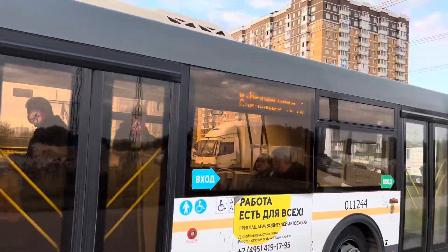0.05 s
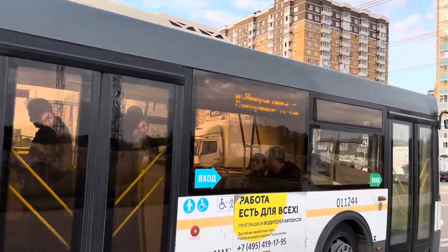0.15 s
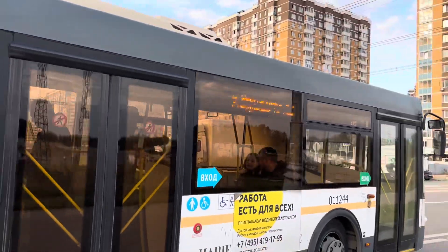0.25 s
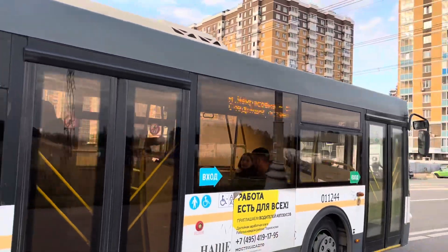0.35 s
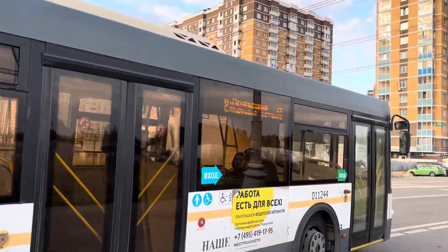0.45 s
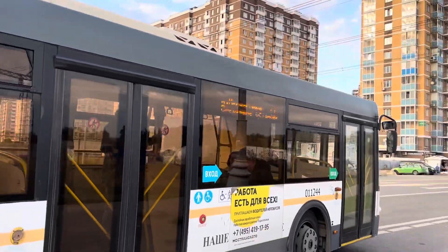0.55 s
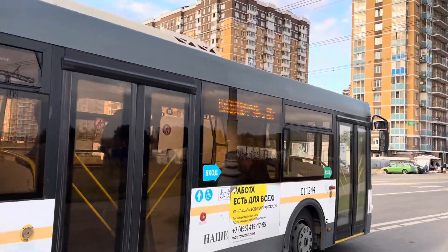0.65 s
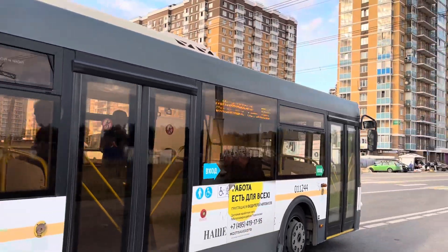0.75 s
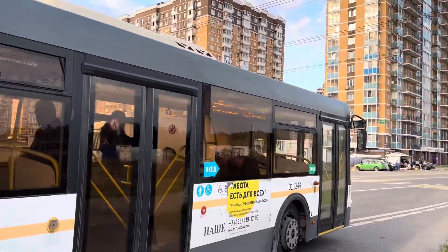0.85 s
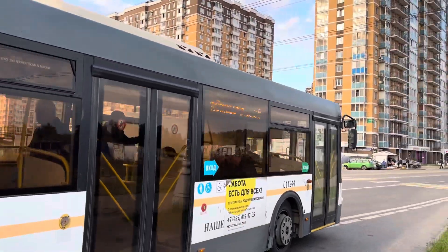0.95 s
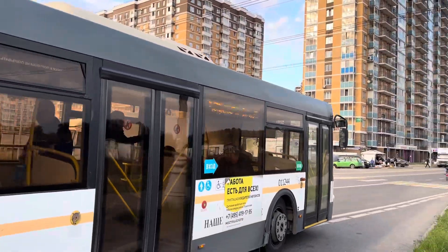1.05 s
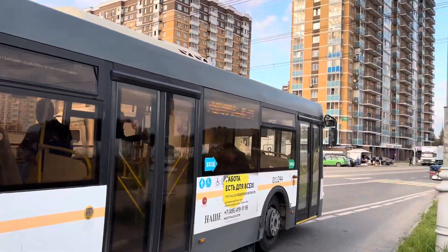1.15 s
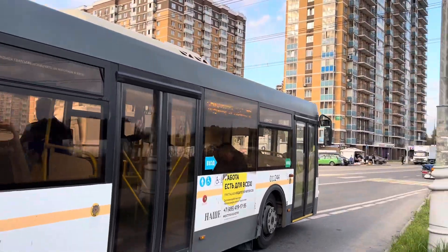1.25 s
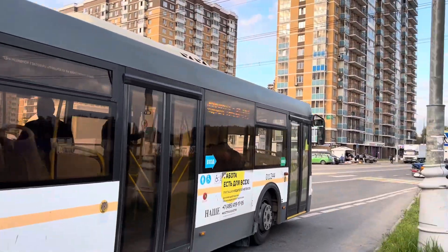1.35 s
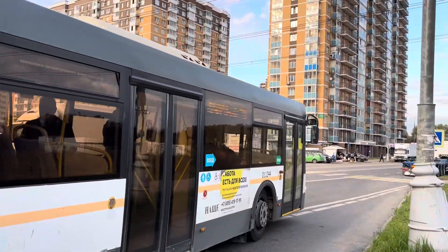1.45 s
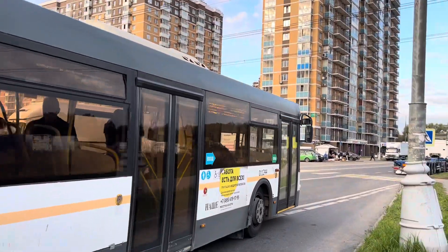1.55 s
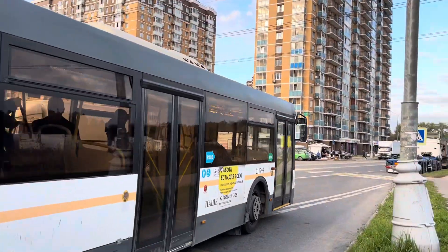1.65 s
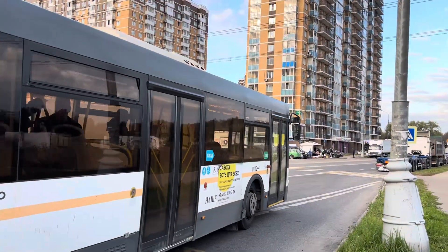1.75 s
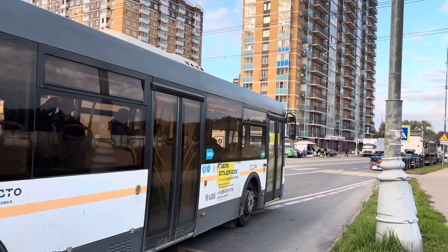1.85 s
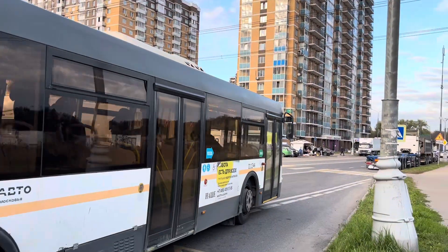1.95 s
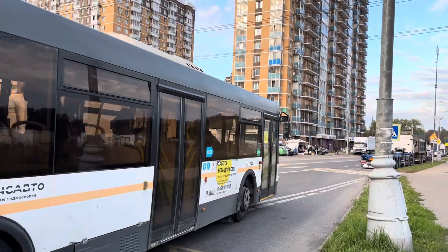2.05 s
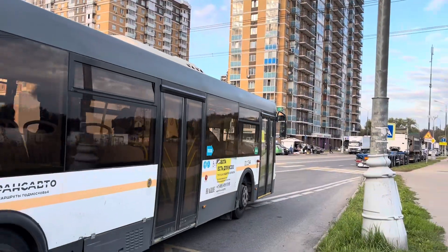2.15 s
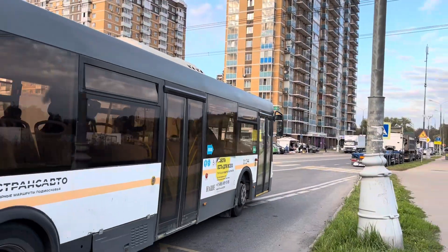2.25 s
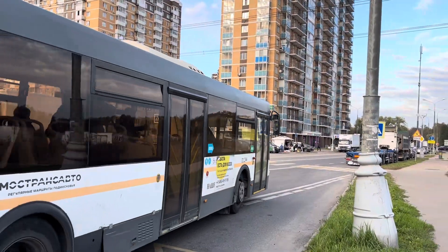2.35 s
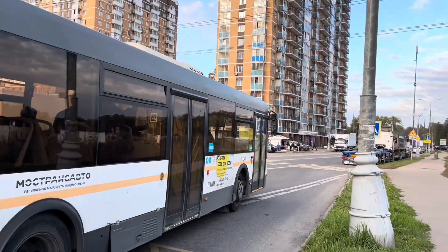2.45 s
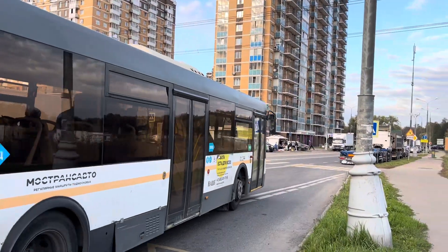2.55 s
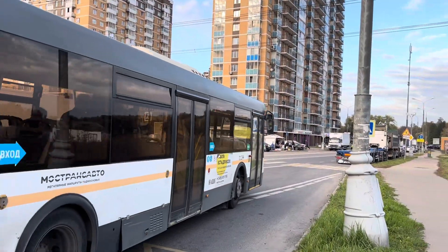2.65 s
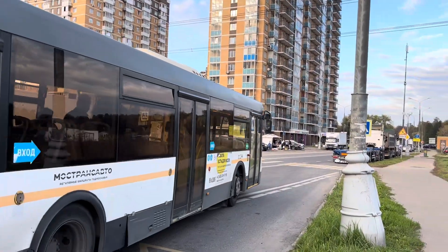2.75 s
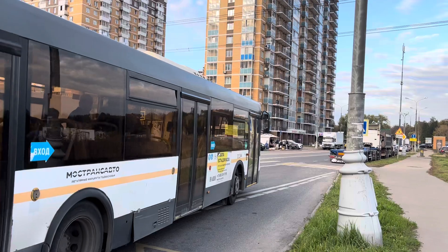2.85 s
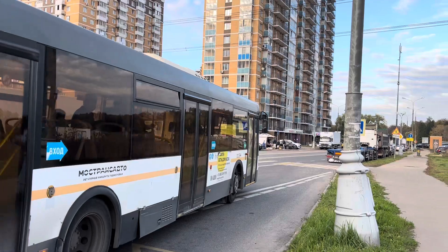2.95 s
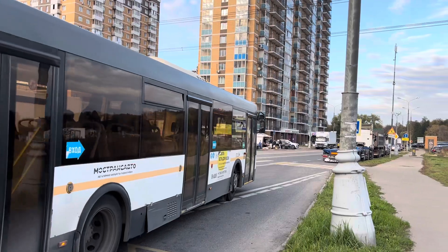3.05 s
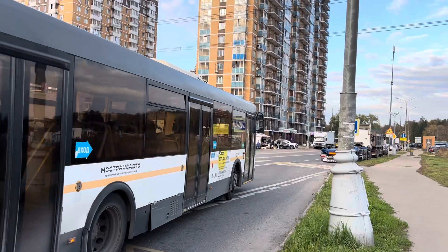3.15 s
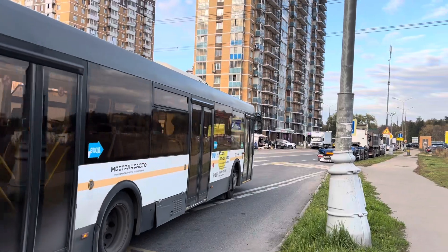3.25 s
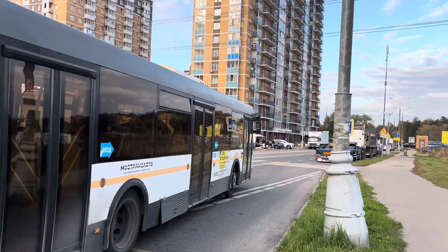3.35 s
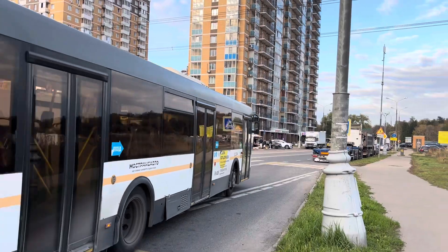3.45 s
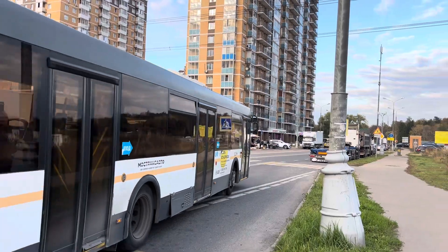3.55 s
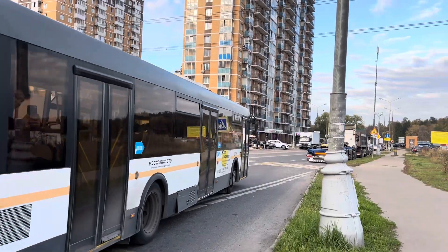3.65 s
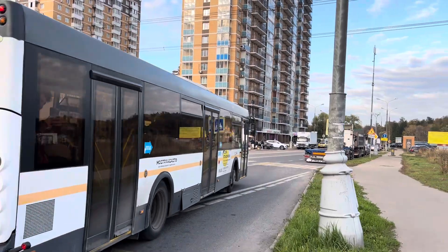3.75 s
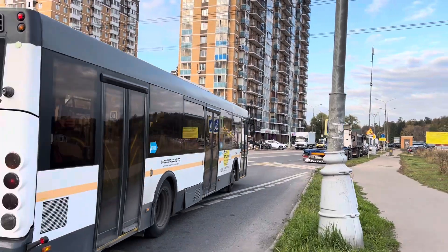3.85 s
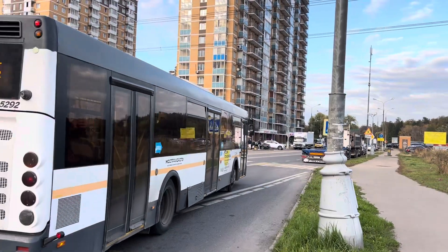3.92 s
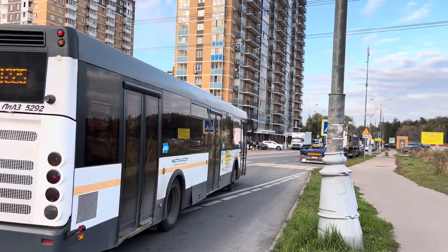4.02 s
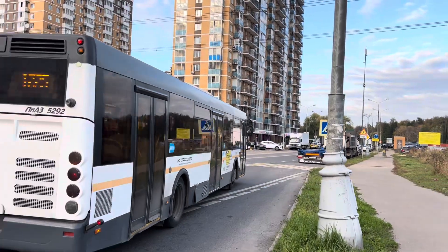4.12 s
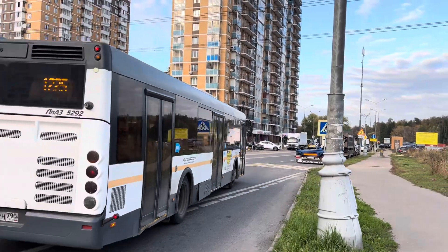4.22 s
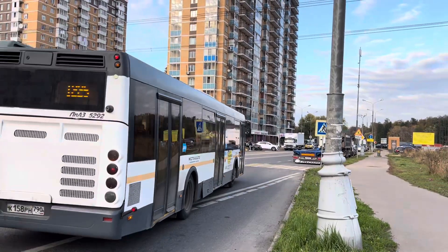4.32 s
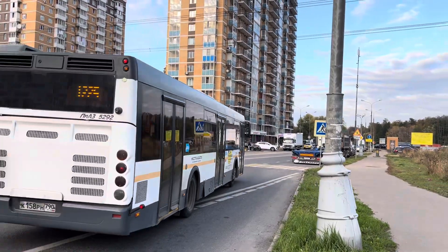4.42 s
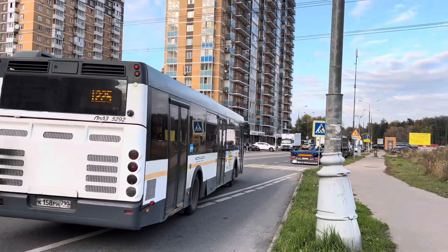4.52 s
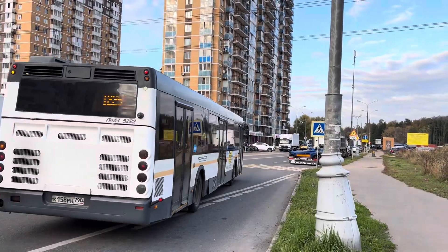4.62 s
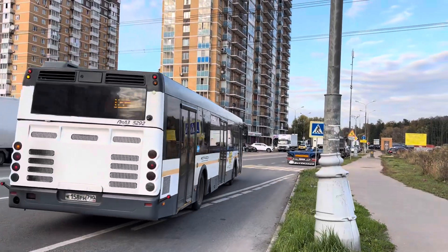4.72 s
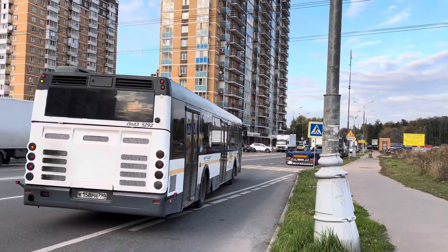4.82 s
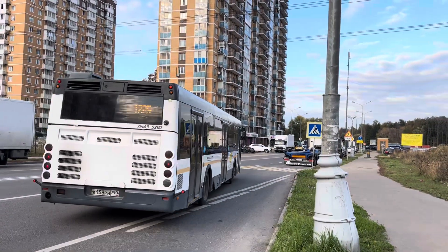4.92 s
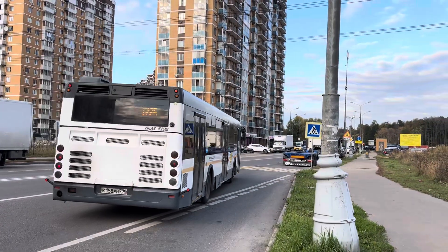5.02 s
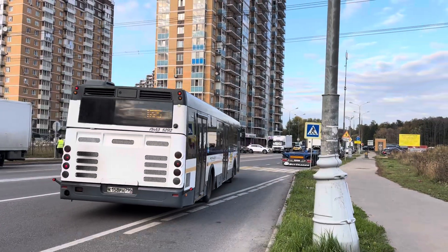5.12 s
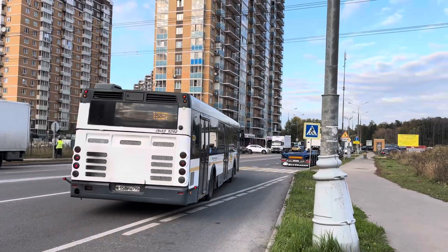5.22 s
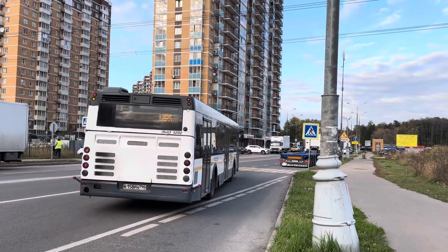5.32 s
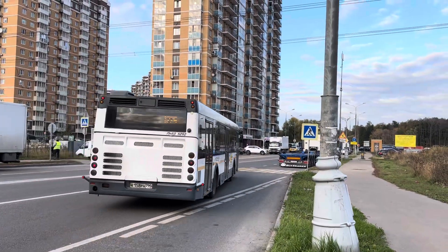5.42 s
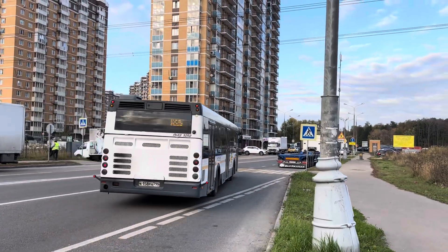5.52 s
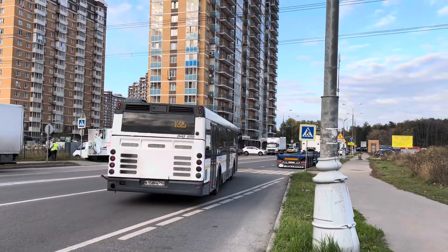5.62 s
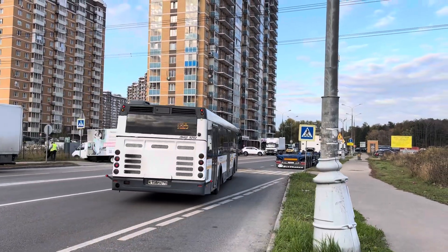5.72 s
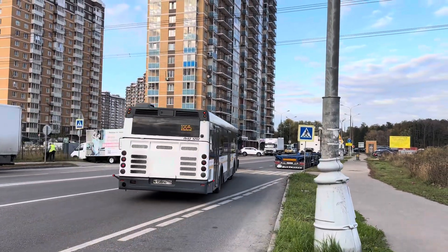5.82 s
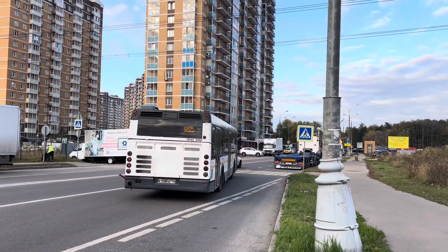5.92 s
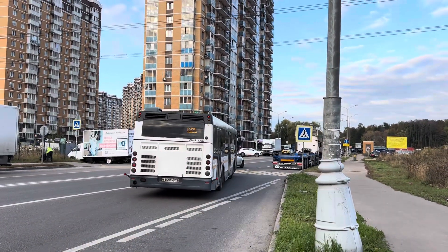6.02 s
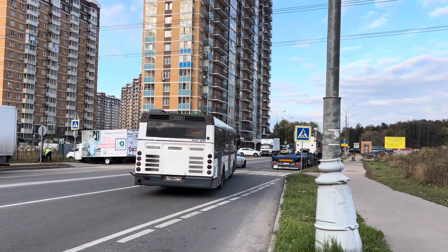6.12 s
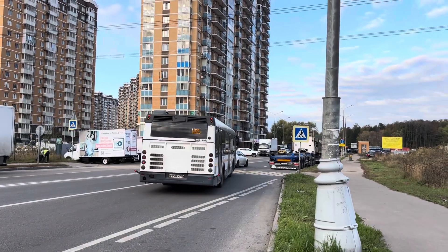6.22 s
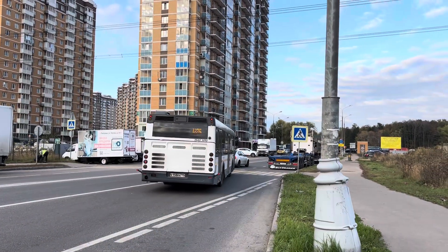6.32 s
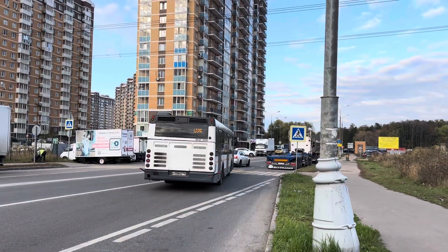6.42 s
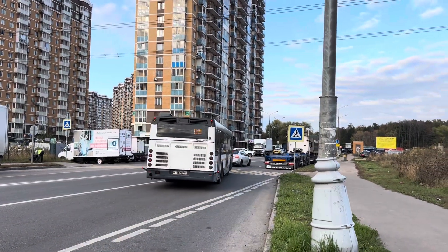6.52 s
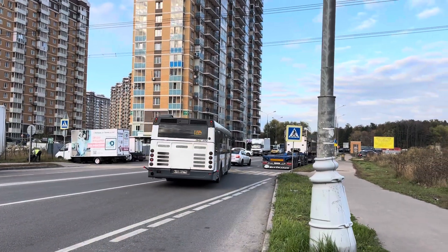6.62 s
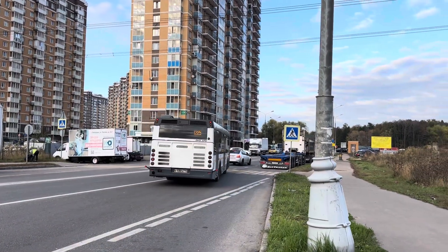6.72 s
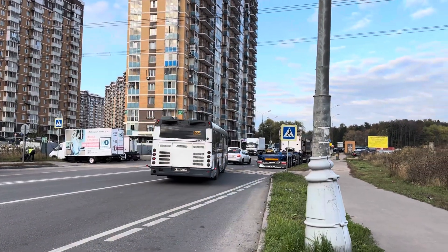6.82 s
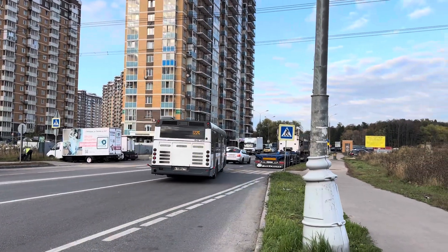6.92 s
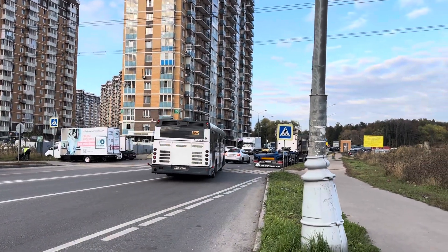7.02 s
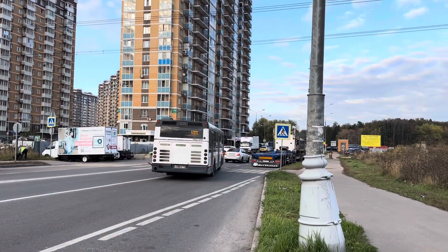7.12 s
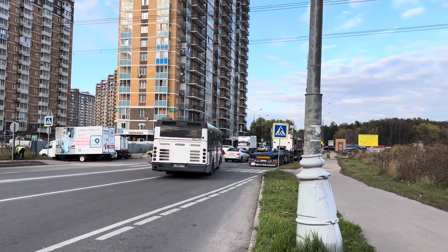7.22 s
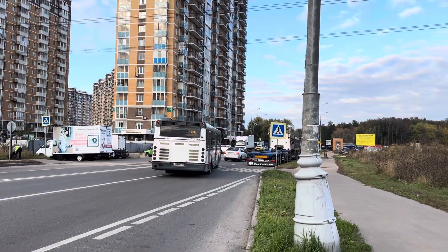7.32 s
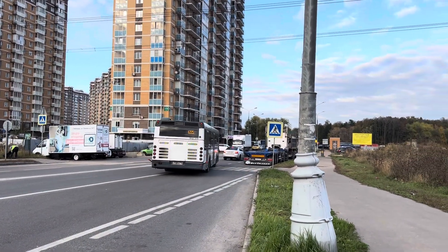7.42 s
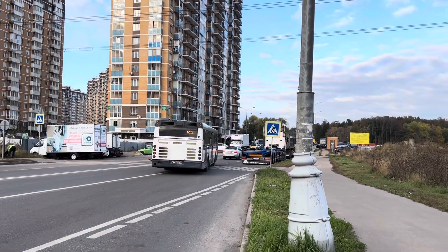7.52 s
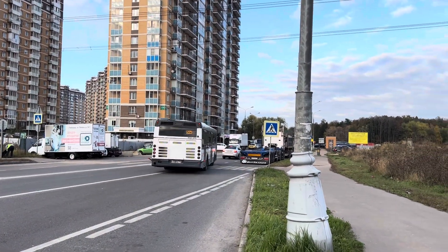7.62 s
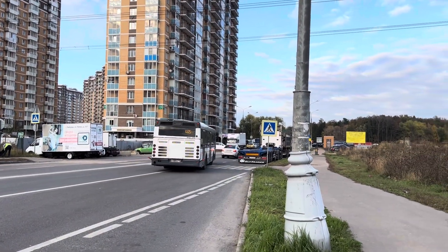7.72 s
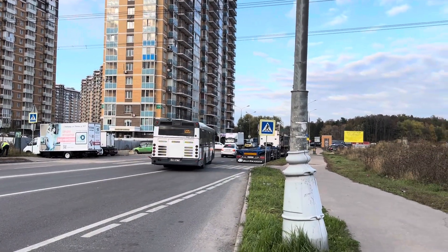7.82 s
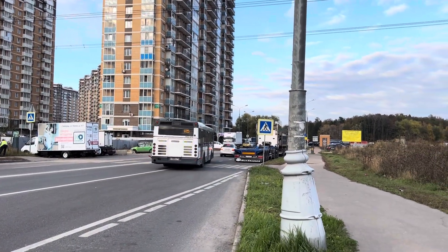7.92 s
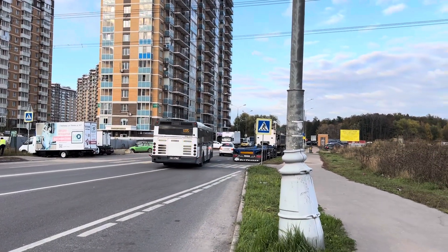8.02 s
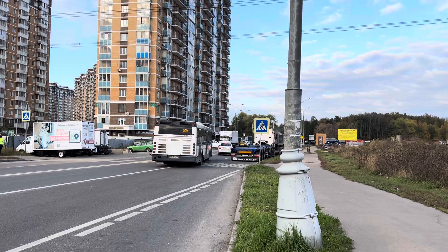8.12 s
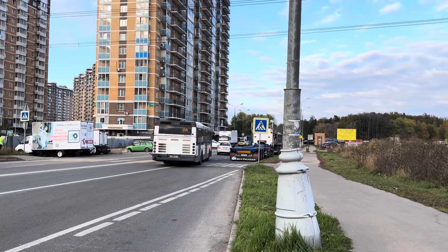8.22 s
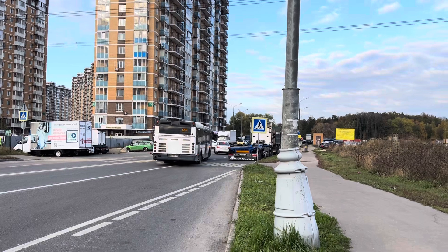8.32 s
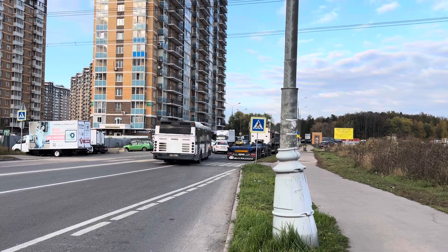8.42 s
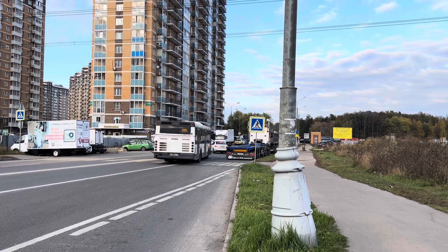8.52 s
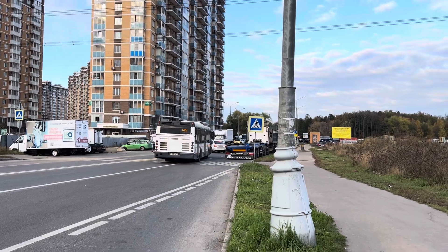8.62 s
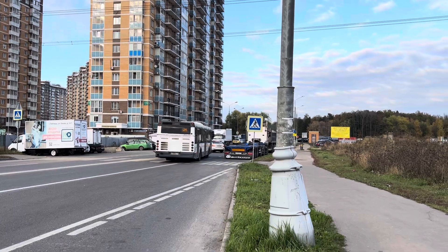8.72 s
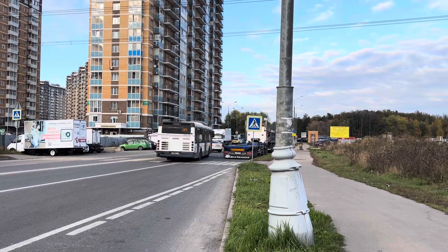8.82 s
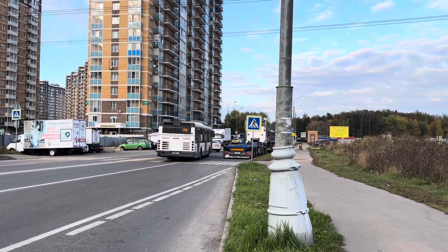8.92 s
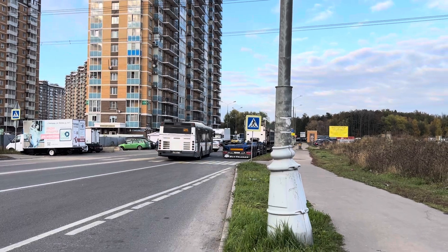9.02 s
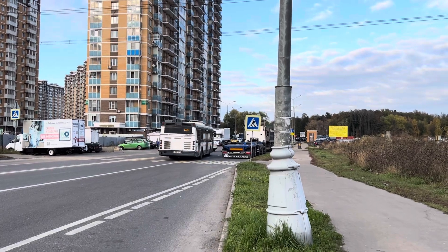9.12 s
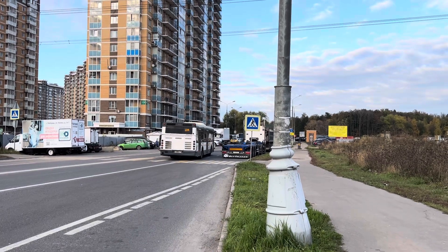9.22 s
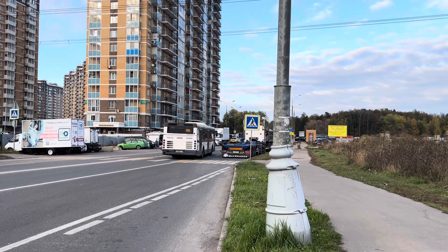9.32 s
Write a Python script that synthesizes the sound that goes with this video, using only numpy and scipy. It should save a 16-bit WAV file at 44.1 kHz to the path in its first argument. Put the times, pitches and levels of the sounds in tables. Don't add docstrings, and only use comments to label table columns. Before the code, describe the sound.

Outdoors beside a busy road, a handheld phone in stereo catches a diesel bus pulling away from the left. A low uneven exhaust throb and gear whine build into hard knocks and a roar of cooling air as it passes abreast. The rear grille rushes loudly, moving to the centre. Near six seconds the driver eases off, the engine softens, pulls again, and briefly drops near eight while traffic hums.

```python
import sys
import numpy as np
from scipy import signal
from scipy.fft import rfft, irfft, next_fast_len
from scipy.io import wavfile
from scipy.ndimage import uniform_filter1d, map_coordinates

SR = 44100
rng = np.random.default_rng(int(sys.argv[2]) if len(sys.argv) > 2 else 0)


def master(y):
    cut = np.clip(np.atleast_2d(y).T, -1, 1)
    pcm = np.round(cut * 32767)
    wavfile.write(sys.argv[1], SR, pcm.astype(np.int16))


def undo_db(level):
    steps = np.asarray(level, float) / 20
    return 10 ** steps


N = 412776

# time_s, firing_hz
FIRING = [(0.0, 43.07), (0.45, 44.92), (1.66, 44.93), (2.14, 42.37), (2.43, 48.92), (2.83, 53.08),
          (3.25, 53.91), (3.91, 58.14), (4.63, 59.39), (4.89, 54.9), (5.1, 54.0), (5.95, 63.93),
          (6.3, 62.28), (7.3, 61.83), (7.9, 60.47), (8.5, 59.79), (9.0, 60.76), (9.36, 62.44)]
FIRST_FIRING = .472
# time_s, boom_db, load_db (under full throttle)
EXHAUST = [(0, -18, -22), (.9, -18, -24), (2.0, -21, -12), (2.4, -15, -2), (3.3, -10, -1.5), (4.3, -8, -1),
           (5.1, -11.5, -1), (5.7, -9, -1.5), (6.12, -9.5, -10.5), (6.26, -32.5, -22), (6.75, -26, -19),
           (7.2, -23.5, -17), (7.38, -13.5, -15), (7.9, -15.5, -14.5), (8.05, -41, -26), (8.38, -30, -19),
           (8.5, -18.5, -24.5), (9.2, -14.5, -10.5)]
UNEVEN = [1.25, -0.84, -0.058, -1.34, 0.86, -1.8]
# centre_hz, width_hz, level_db
PIPE = [(90, 60, 0), (160, 70, -12)]
# place_cycles, then level_db into each manifold mode
KNOCKS = [(.11, 0, 0, 0, 0, -11, 0), (.29, -8, -11, -13, -12, -13, -14), (.44, -7, -7, -5, -2, 0, -4),
          (.6, -8, -9, -10, -6, -8, -13), (.79, -6, -4, -6, -12, -14, -14),
          (.94, -10, -12, -11, -14, -7, -14)]
# centre_hz, width_hz, level_db
MANIFOLD = [(199.5, 40, 7.5), (301.5, 86, 1.5), (393, 55, -3), (479.6, 45, -2), (789, 72, -3.5),
            (1253, 200, -23.5)]
# turns_per_cycle, level_db (over the knocks)
THROB = [(19, -11), (21, -13), (23, -13), (25, -15), (29, -17), (35, -14), (41, -10), (58, -19)]
# centre_hz, width_hz, level_db (over the knocks)
SNAP = (430, 320, -10)
# place_cycles, level_db
PUFFS = [
    (.21, -5),
    (.56, -11),
    (.85, 0),
]
# firing_hz, second_db, third_db (harmonics over boom), shell_db
SILENCER = [(41.8, 1.5, -11, 4.5), (41.7, 13.5, 7, 5), (51.3, -0.5, -10, 2.5), (54.7, -2.5, -13.5, -0.5),
            (58.5, -8.5, -9.5, -0.5), (64.2, -15.5, -17.5, 0.5)]
# start_s, end_s, second_db, third_db
SURGES = [
    (7.093, 7.5, -31.5, -28),
    (7.712, 8.124, -31, -44),
]
SURGE_DB_PER_S = 150
# start_s, end_s (deepest), depth_db, sinking_db_per_s
LIFTS = [
    (6.8, 6.983, 13.5, 20),
    (8.05, 8.355, 3.5, 33),
]
RETURN_DB_PER_S = 98
# first_crest_s, period_s, depth_share, decay_s
SHUDDER = [
    (5.98, .385, .03, 1.3),
    (8.17, .48, .016, 2.5),
]
# start_s, end_s, multiple_of_firing_rate,
# level_db
ORDER_TONES = [(.4, 1.8, 18.75, -41), (1.95, 2.3, 18.8, -38), (0, 1.9, 37.3, -54), (2.05, 2.2, 36.6, -46),
               (3.2, 4.6, 37.7, -52), (.9, 1.6, 75.4, -62), (3.85, 4.0, 56.8, -50), (4.85, 5.15, 56.4, -51),
               (5.4, 5.98, 56.2, -47), (6.15, 6.8, 56.2, -56), (6.95, 8.3, 56.1, -59), (8.55, 8.75, 56.8, -53),
               (8.9, 9.36, 55.9, -59), (.4, 1.9, 56.5, -58), (3.05, 3.75, 5.68, -31), (3.0, 3.8, 5.85, -29),
               (3.1, 3.75, 6.18, -31), (3.05, 3.7, 6.35, -33), (.9, 1.9, 4.01, -34), (.9, 1.9, 4.34, -31),
               (.7, 1.9, 4.17, -35), (7.15, 7.9, 3.33, -36), (7.15, 7.9, 3.17, -38), (5.7, 6.12, 3.18, -28),
               (2.25, 2.7, 23, -44)]
# start_s, end_s, start_hz, end_hz, level_db
FREE_WHINES = [(0, .2, 603, 608, -42), (.4, 1.7, 606, 590, -49), (.5, 1.6, 422.7, 405, -43),
               (4.05, 4.3, 8250, 8800, -56), (6.3, 6.58, 6500, 5750, -63), (6.7, 6.9, 5850, 5700, -67),
               (6.9, 9.3, 4600, 4550, -68), (9.05, 9.36, 508, 515, -38), (6.15, 7.05, 325, 297, -44),
               (5.75, 6.05, 5750, 6000, -62), (8.6, 9.36, 1480, 1500, -55)]
WHINE_DB_PER_S = 70

# frequency_hz, density_db
ROAR = [(20, -31), (45, -24), (80, 7), (140, -23), (250, 6), (450, -21), (900, -17), (2000, -67)]
FLANK = [(150, -19), (300, 3), (450, -1.5), (650, -5), (1000, -1), (1400, 2), (1650, 0), (1900, -9),
         (2300, -13), (3200, -17), (4400, -29), (7500, -25), (15000, -49)]
GRILLE = [(150, -27), (300, -4), (700, -4), (1200, -11), (1800, -17.5), (3000, -19.5), (3700, -18.5),
          (4350, -23.5), (5200, -24.5), (6500, -25.5), (9000, -33), (15000, -44.5)]
AIR = [(2000, -21.5), (4500, -15), (8000, -3.5), (13000, -4.5), (15500, -7.5)]
LOUVRE = [(3500, -33.5), (5500, -11), (7500, 10), (8800, 4), (13000, -4.5), (15500, -8)]
INTAKE = [(3900, -16), (4250, -2), (4550, -2), (4900, -15)]
TYRES = [(950, -23), (1120, 0), (1250, 3), (1450, -18)]
ROAD = [(25, -30.5), (50, 6.5), (90, -0.5), (200, -3), (380, -26.5), (750, -11.5), (900, -19),
        (1150, -24.5), (1650, -20), (2050, -31.5), (2600, -34), (4400, -58), (9000, -60), (15000, -58)]
SLIPSTREAM = [(14, -15), (27, 0), (36, -8), (50, -40)]

# start_s, end_s (of the top), level_db, rise_db_per_s, fall_db_per_s
GUST = (2.5, 3.2, -38, 14, 6)
ABREAST = (2.23, 2.99, 6.7, 27, 5.1)
LAST_PUSH = (5.85, 5.97, 3.5, 16, 54)
BANDS = [
    (3.3, 4.1, -42.5, 27, 11),
    (5.5, 6.2, -42.5, 5.4, 3.3),
]

# time_s, level_db (under the closest pass)
NEAR = [(0, -27.5), (.97, -17), (2.02, -9.5), (2.69, -3), (3.0, -1.5), (3.7, -1.5), (5.95, -5.5),
        (6.89, -15.5), (9.36, -14.5)]
# time_s, left_share (0 ahead, 1 left)
BEARING = [(.01, 1), (2.01, 0.97), (3.01, 0.64), (3.8, 0.35), (4.5, 0.0036), (9.36, .01)]
STREET_BEARING = [(0, 0.85)]  # time_s, left_share
# frequency_hz, ahead_lead_rad, left_lead_rad (left port leads), likeness_share, left_over_right_db
PORTS = [(40, .04, .2, .995, .1), (172, .1, .6, .98, .8), (344, .3, 1.4, .93, 2.1),
         (775, .6, 2.6, .88, 2.1), (1150, .9, 3.1, .85, .3), (1550, 2.8, 4.2, .75, -1.5),
         (1890, 6.3, 7.2, .92, 4.1), (2400, 6.9, 6.6, .8, 2.1), (3500, 7.4, 8.1, .65, 2.1),
         (4700, 6.6, 7.1, .6, 2.5), (5400, 5.3, 4.1, .5, 3.1), (6400, 6.2, 5.9, .95, .5),
         (7500, 6.28, 6.28, .98, 0)]
FLIP_HZ, FLIP_EVERY_HZ, FLIP_WIDTH_HZ, FLIP_BLUR = 8480, 2900, 250, .47

SECOND_NEAR, THIRD_NEAR, KNOCK_NEAR, SHELL_NEAR = 0.5, 1, 0.17, 0.41
KNOCK_DB, SHELL_DB = -19, -20.5
GRILLE_DB, AIR_DB, AIR_NEAR, AIR_LOAD = -34.5, -40.5, 1.39, 0.39
FLANK_DB, FLANK_LEFT_DB, FLANK_NEAR = -44, 11.5, 0.1
LOUVRE_DB, LOUVRE_NEAR, LOUVRE_LEFT_DB = -53, 1, 19
ROAD_DB = -30


def unit(x):
    return x / np.sqrt(np.mean(x ** 2) + 1e-20)


def curves(rows, at=None):
    points, *columns = np.transpose(rows)
    at = np.arange(N) / SR if at is None else at
    return [np.interp(at, points, column) for column in columns]


def swell(start, end, top_db, rise, fall):
    t = np.arange(N) / SR
    return top_db - rise * (start - t).clip(0) - fall * (t - end).clip(0)


def wobble(rate):
    knots = rng.standard_normal(int(N * rate / SR) + 4)
    return map_coordinates(knots, [np.arange(N) * rate / SR])


def filtered(x, response):
    size = next_fast_len(N + SR // 2)
    return irfft(rfft(x, size) * response(np.fft.rfftfreq(size, 1 / SR)), size)[..., :N]


def mode(f, hz, width):
    return 1j * f * width / (hz * hz - f * f + 1j * f * width)


def blurred_noise(shape, bins, frames):
    field = uniform_filter1d(rng.standard_normal(shape), size=bins, axis=0)
    return uniform_filter1d(field, size=frames, axis=1)


def rush(spectrum, patchy_db):
    z = signal.stft(rng.standard_normal(N), nperseg=512)[2]
    patches = undo_db(patchy_db * unit(blurred_noise(z.shape, 5, 12)))
    x = signal.istft(z * patches, nperseg=512)[1][:N]
    hz, db = np.transpose(spectrum)
    return unit(filtered(x, lambda f: undo_db(np.interp(np.log(f + 1), np.log(hz), db, -120, -120))))


def crank():
    rate, = curves(FIRING)
    firings = np.cumsum(rate) / SR + FIRST_FIRING
    return rate, firings, firings / 6 - .0075 * (62 - rate)


def beats(cycle, place, scatter_db):
    turns = np.floor(cycle - place)
    hits = np.diff(turns, prepend=turns[0]).clip(0)
    return hits * undo_db(scatter_db * rng.standard_normal(N))


def loads(rate):
    boom_db, load_db = curves(EXHAUST)
    near_db, = curves(NEAR)
    second_db, third_db, shell_db = curves(SILENCER, rate)
    second_db = boom_db + second_db + SECOND_NEAR * near_db
    third_db = boom_db + third_db + THIRD_NEAR * near_db
    for start, end, two_db, three_db in SURGES:
        shape_db = swell(start, end, 0, SURGE_DB_PER_S, SURGE_DB_PER_S)
        second_db = np.maximum(second_db, two_db + shape_db)
        third_db = np.maximum(third_db, three_db + shape_db)
    lifts_db = sum(swell(*row, RETURN_DB_PER_S).clip(0) for row in LIFTS)
    shell_db = SHELL_DB + shell_db + SHELL_NEAR * near_db - lifts_db
    knock_db = KNOCK_DB + load_db + KNOCK_NEAR * near_db
    return boom_db, second_db, third_db, knock_db, shell_db


def firing_boom(rate, firings, boom_db, second_db, third_db):
    lead = .2 * (rate - 50)
    turn = 2 * np.pi * firings
    boom = undo_db(boom_db + 0.34 * wobble(8.3)) * np.cos(turn)
    boom += undo_db(second_db + 1.16 * wobble(16)) * np.cos(2 * turn + lead)
    boom += undo_db(third_db + 0.8 * wobble(7.3)) * np.cos(3 * turn + lead)
    return np.sqrt(2) * boom


def cylinder_lope(firings, lope_db):
    pushes = sum(share * beats(firings / 6, (k + .3) / 6, scatter_db=.7) for k, share in enumerate(UNEVEN))

    def pipe(f):
        return sum((-1) ** k * undo_db(db) * mode(f, hz, w) ** 3 for k, (hz, w, db) in enumerate(PIPE))

    return undo_db(lope_db) * unit(filtered(pushes, pipe))


def manifold_knocks(cycle, knock_db, shell_db):
    blows = np.array([beats(cycle + .03, row[0], scatter_db=.8) for row in KNOCKS])
    drive = undo_db(np.array(KNOCKS)[:, 1:]).T @ blows

    def ring(f):
        return [(-1) ** k * undo_db(db) * mode(f, hz, w) ** 2 for k, (hz, w, db) in enumerate(MANIFOLD)]

    shell, *manifold = filtered(drive, ring)
    knocks = undo_db(knock_db - 3.0) * unit(sum(manifold))
    knocks += undo_db(shell_db - 5.0 + 2.1 * wobble(3)) * unit(shell)
    for turns, db in THROB:
        knocks += undo_db(knock_db + db + wobble(5)) * np.cos(2 * np.pi * turns * (cycle - .1))
    snap_hz, snap_width, snap_db = SNAP
    snap = filtered(beats(cycle, .085, scatter_db=1.5), lambda f: -mode(f, snap_hz, snap_width) ** 3)
    return knocks + undo_db(knock_db + snap_db) * unit(snap)


def exhaust():
    rate, firings, cycle = crank()
    boom_db, second_db, third_db, knock_db, shell_db = loads(rate)
    boom = firing_boom(rate, firings, boom_db, second_db, third_db)
    lope = cylinder_lope(firings, .5 * boom_db + .5 * second_db - 6)
    knocks = manifold_knocks(cycle, knock_db, shell_db)
    roar_db = .5 * boom_db + .5 * knock_db - 19
    roar = undo_db(roar_db + 1.5 * wobble(6)) * rush(ROAR, patchy_db=1.5)
    return boom + lope + knocks + roar


def whines():
    t, rate = np.arange(N) / SR, crank()[0]
    for crest, period, depth, dies in SHUDDER:
        since = t - crest
        swing = np.cos(2 * np.pi * since / period) * np.exp(-since.clip(0) / dies)
        rate = rate * (1 + depth * swing * (since > -period / 4))
    tones = [(a, b, order * rate, db) for a, b, order, db in ORDER_TONES]
    tones += [(a, b, np.interp(t, [a, b], [from_hz, to_hz]), db) for a, b, from_hz, to_hz, db in FREE_WHINES]
    out = np.zeros(N)
    for start, end, hz, db in tones:
        level = undo_db(swell(start, end, db, WHINE_DB_PER_S, WHINE_DB_PER_S) + 2 + 2 * wobble(12))
        unsteady_hz = hz * (1 + .002 * wobble(6) + .001 * wobble(40))
        out += level * np.sin(2 * np.pi * np.cumsum(unsteady_hz) / SR)
    return out


def road():
    slipstream = undo_db(swell(*GUST) + 2 * wobble(5)) * rush(SLIPSTREAM, patchy_db=0)
    traffic_db = ROAD_DB + .7 * wobble(0.42) + .8 * wobble(4.6)
    return undo_db(traffic_db) * rush(ROAD, patchy_db=2.0) + slipstream


def side_vents():
    near_db, left = curves(NEAR)[0], curves(BEARING)[0]
    flank_db = FLANK_DB + FLANK_NEAR * near_db + FLANK_LEFT_DB * left + swell(*ABREAST).clip(0)
    louvre_db = LOUVRE_DB + LOUVRE_NEAR * near_db * left + LOUVRE_LEFT_DB * left - 4 * (1 - left)
    flank = undo_db(flank_db + 2.5 + 0.19 * wobble(15)) * rush(FLANK, patchy_db=2.0)
    return flank + undo_db(louvre_db) * np.clip(left, 0, 1) * rush(LOUVRE, patchy_db=2.0)


def rear_grille():
    grille_db = GRILLE_DB + curves(NEAR)[0] + swell(*LAST_PUSH).clip(0)
    return undo_db(grille_db + 7 + 0.49 * wobble(7)) * rush(GRILLE, patchy_db=0.5)


def air_puffs():
    air_db = AIR_DB + AIR_NEAR * curves(NEAR)[0] + AIR_LOAD * curves(EXHAUST)[1]
    cycle = crank()[2]
    t = np.arange(SR // 8) / SR
    decay = undo_db(-60 * t / 0.037) * (1 - np.exp(-t / 0.0029))
    openings = sum(undo_db(db) * beats(cycle, place, scatter_db=3) for place, db in PUFFS)
    puffs = undo_db(2.5 * wobble(9)) * signal.fftconvolve(openings, decay)[:N]
    return undo_db(air_db + 5.5) * unit(rush(AIR, patchy_db=1.1) * (.28 + puffs))


def intake_and_tyres():
    return sum(undo_db(swell(*row)) * rush(band, patchy_db=1.5) for row, band in zip(BANDS, (INTAKE, TYRES)))


def ports(x, bearing):
    hz, s, direct = signal.stft(x, SR, nperseg=2048)
    drift = blurred_noise(direct.shape, 7, 15)
    wet = direct * np.exp(2j * unit(drift))
    ahead, left, alike, tilt_db = (c[:, None] for c in curves(PORTS, hz))
    steps = (hz[:, None] - FLIP_HZ - FLIP_EVERY_HZ * np.arange(3)) / FLIP_WIDTH_HZ
    flip = np.pi * (.5 + .5 * np.tanh(steps / 2)).sum(1, keepdims=True)
    alike = alike - FLIP_BLUR * np.exp(-steps ** 2 / 3).sum(1, keepdims=True)
    share, = curves(bearing, s)
    turn = np.arccos(np.clip(alike, -1, 1)) / 2
    half = np.exp(.5j * (ahead + (left - ahead) * share - flip)) * undo_db(tilt_db / 2)
    common, differing = direct * np.cos(turn), wet * np.sin(turn)
    pair = [(common + differing) * half, (common - differing) / half]
    return signal.istft(np.array(pair), SR, nperseg=2048)[1][:, :N]


def scene():
    bus = exhaust() + whines() + rear_grille() + air_puffs() + intake_and_tyres()
    street = road() + side_vents()
    return ports(bus, BEARING) + ports(street, STREET_BEARING)


def band_limit(x):
    return signal.sosfilt(signal.butter(12, 15700, fs=SR, output="sos"), x)


def record(dry):
    dry = filtered(dry, lambda hz: hz < 16500)
    rounded = dry / (1 + np.abs(dry / .98) ** 8) ** (1 / 8)
    return band_limit(rounded)


dry = scene()
out = record(dry)
master(out)
```